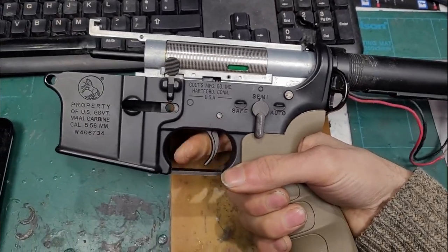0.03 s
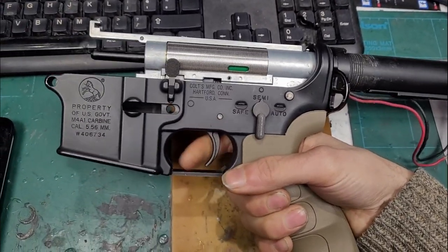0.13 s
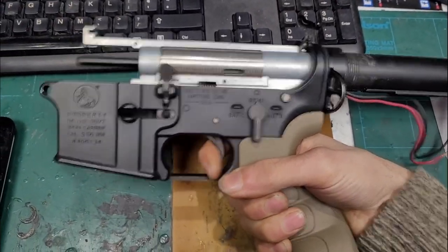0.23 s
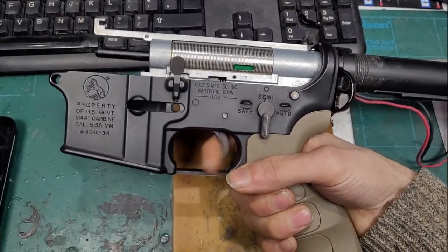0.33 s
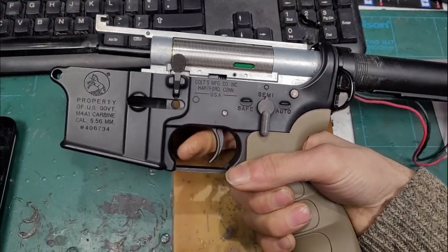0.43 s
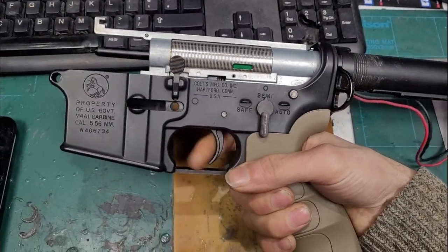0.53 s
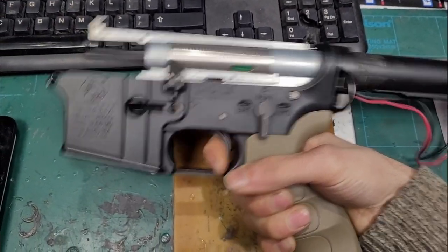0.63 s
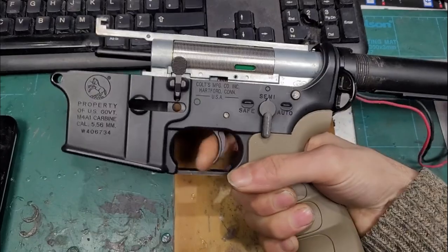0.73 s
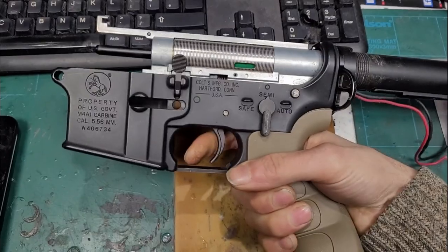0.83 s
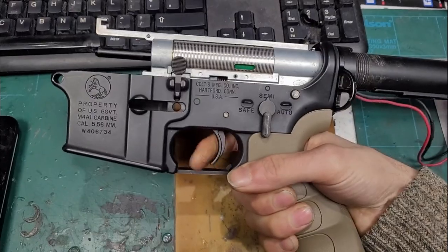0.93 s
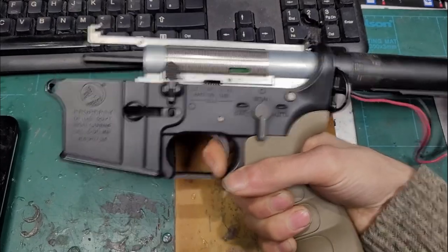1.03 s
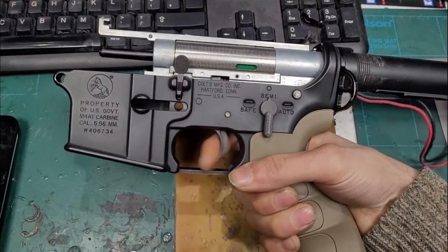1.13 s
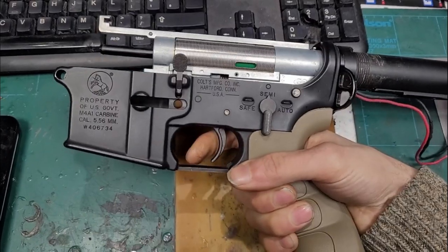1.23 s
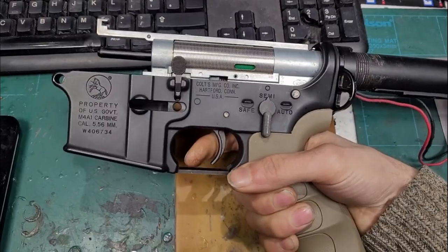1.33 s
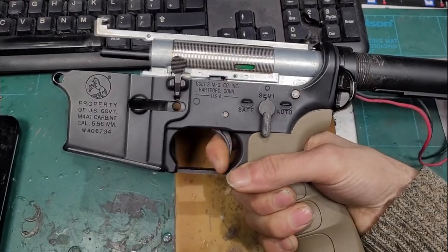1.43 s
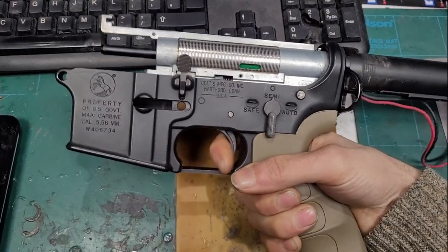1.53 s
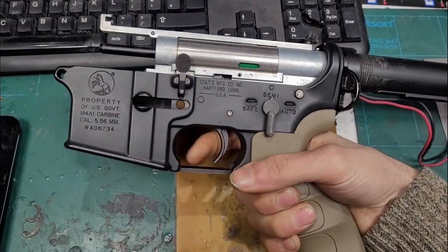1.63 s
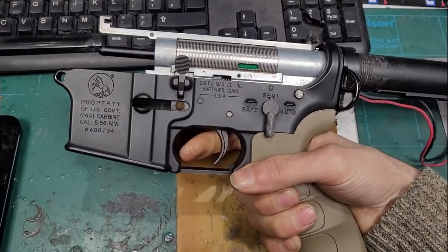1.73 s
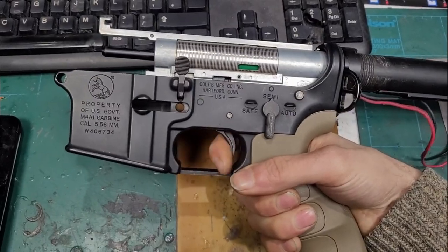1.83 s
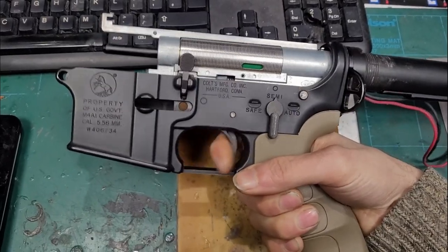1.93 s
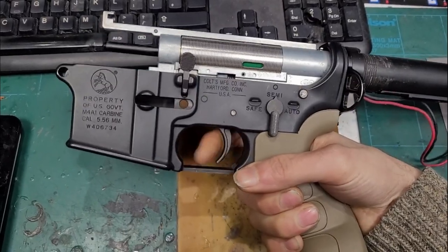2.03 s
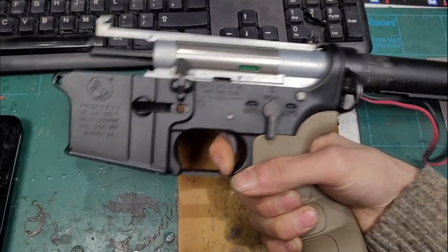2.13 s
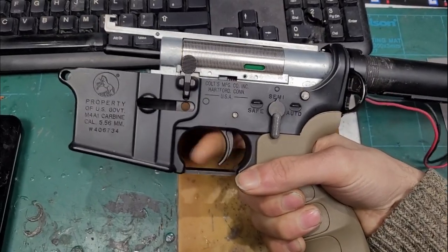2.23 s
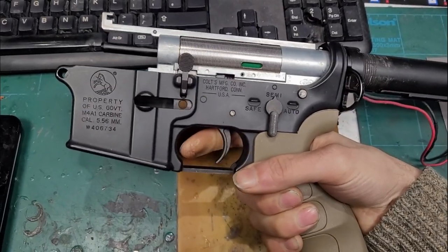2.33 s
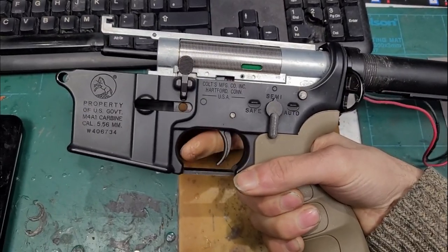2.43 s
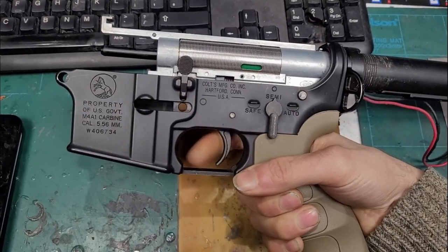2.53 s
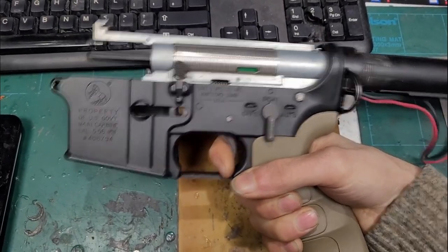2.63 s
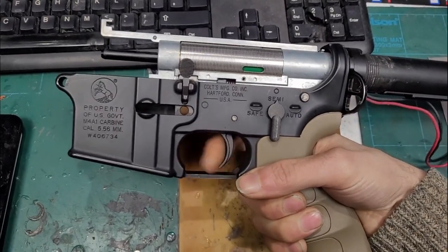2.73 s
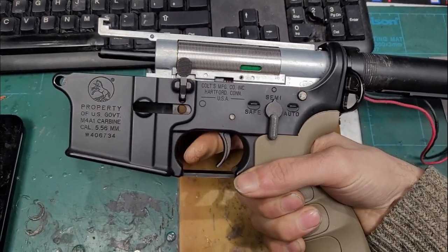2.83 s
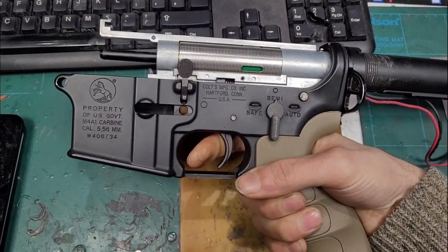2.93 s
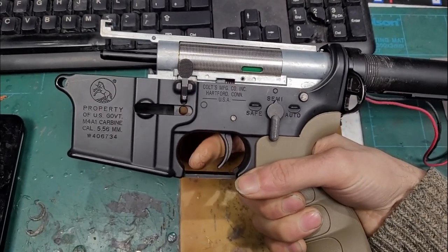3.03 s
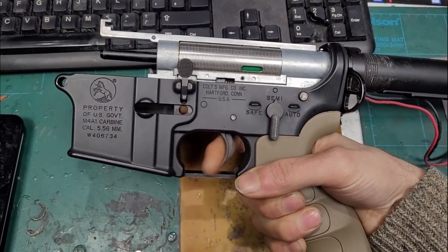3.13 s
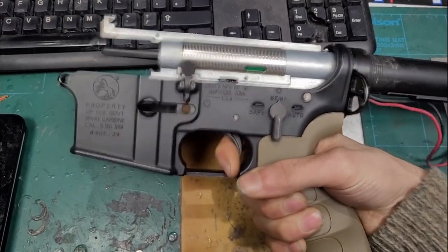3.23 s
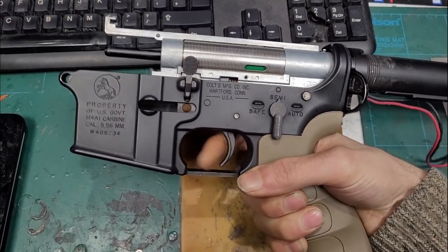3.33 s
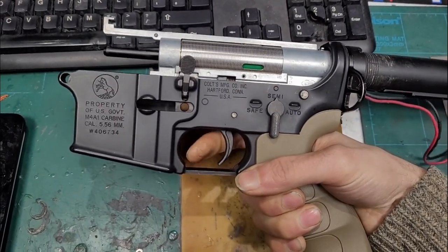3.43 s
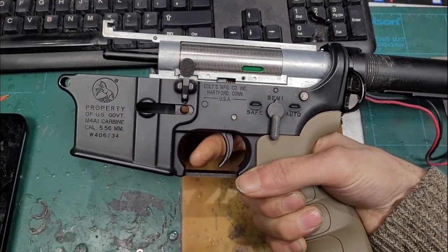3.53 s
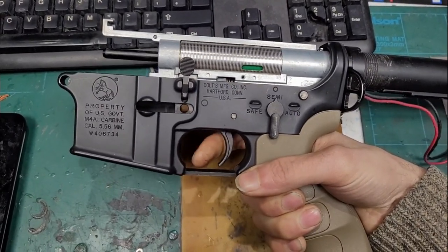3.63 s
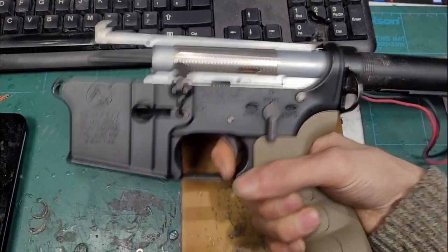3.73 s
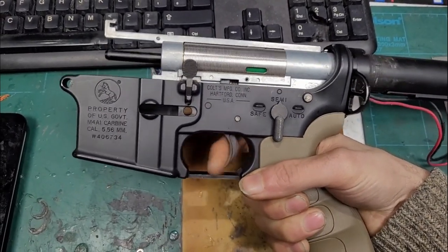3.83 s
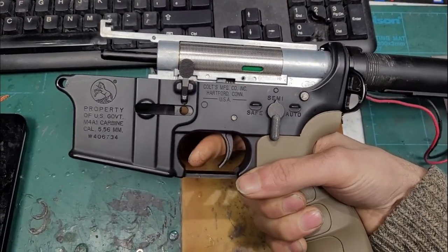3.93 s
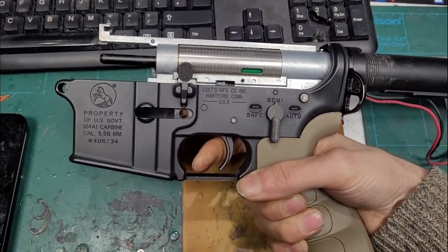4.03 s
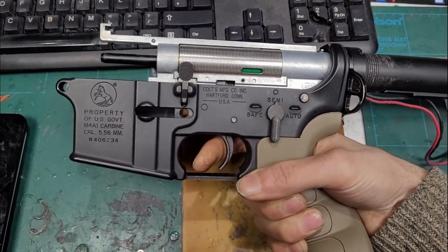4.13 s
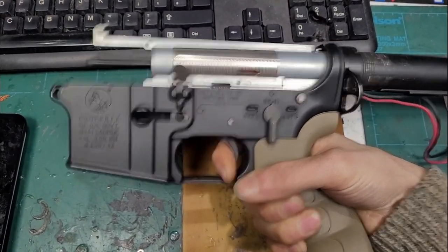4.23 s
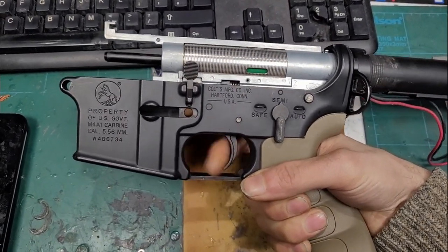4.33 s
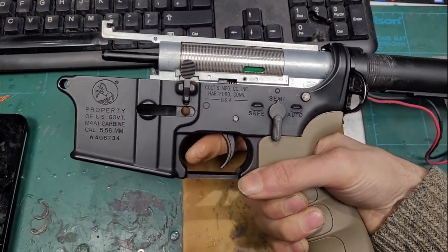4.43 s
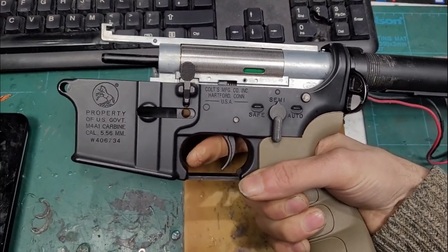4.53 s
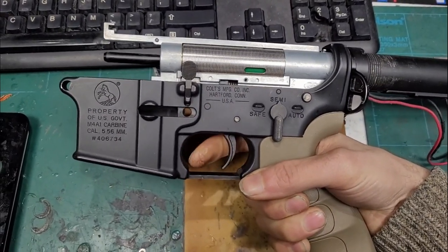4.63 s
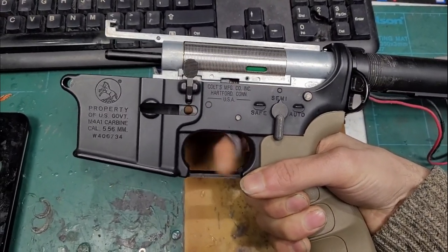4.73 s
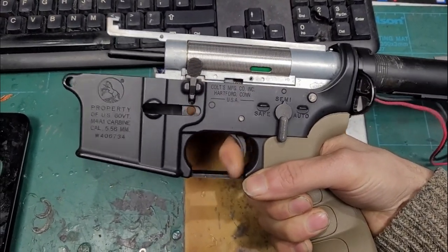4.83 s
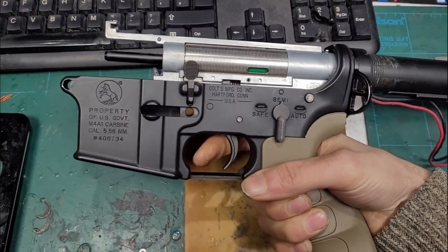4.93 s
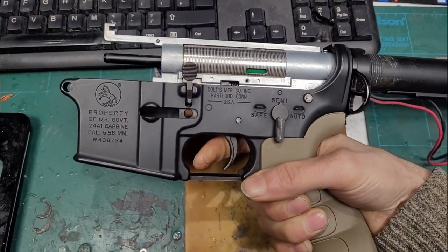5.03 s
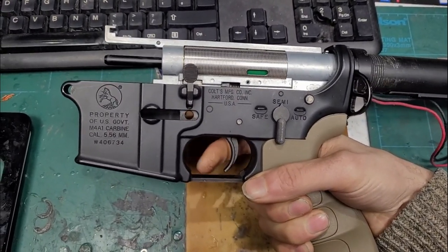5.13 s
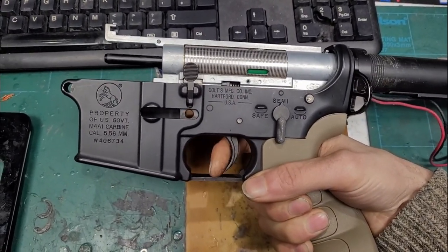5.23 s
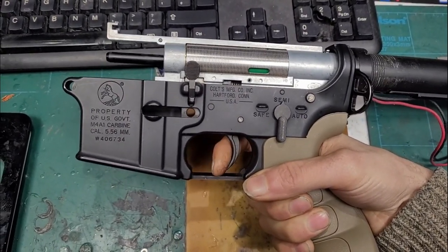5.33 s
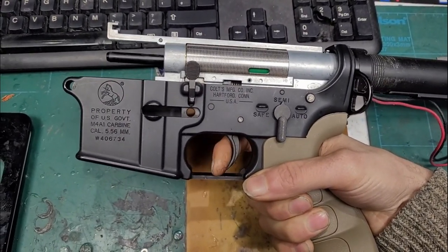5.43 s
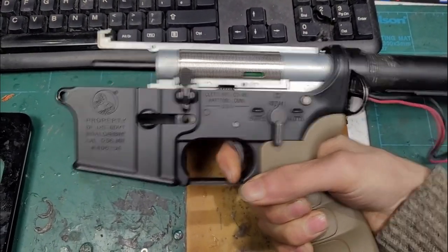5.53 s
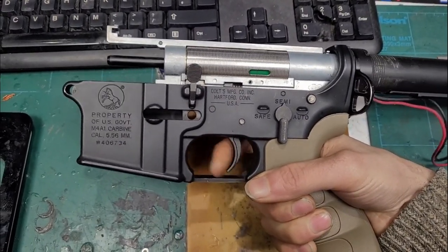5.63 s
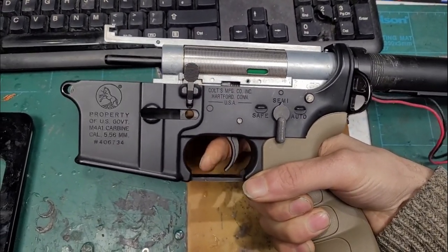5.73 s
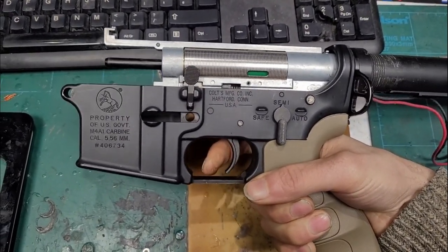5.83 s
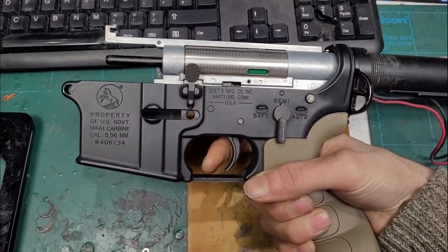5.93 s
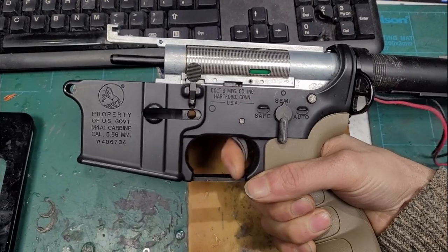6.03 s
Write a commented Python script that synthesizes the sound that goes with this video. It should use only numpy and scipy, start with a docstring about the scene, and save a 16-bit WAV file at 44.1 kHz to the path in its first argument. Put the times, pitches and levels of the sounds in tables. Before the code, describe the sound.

A phone close to a bench picks up about a dozen dry, bright mechanical shots from an airsoft rifle's open gearbox. Gears grind for a fraction of a second, the piston snaps forward with a hard clack, metal rattles and everything halts. Spacing is uneven, from a quick pair to longer gaps. Tiny latch ticks and one dull finger tap fall between; soft fans hum in the small room.

```python
"""A workbench in a small quiet room, where fans hum: an open electric airsoft gearbox runs under a phone.
In each cycle the motor spins up and gear teeth grind (noise gated by uneven tooth contacts).
The piston is picked up, released and slams home (short noise cracks), then the gears coast and stop.
The metal shell and the bench ring as sets of fading tones; small ticks and one dull tap come in between.
The fans are shaped noise with wandering tones, and the walls add a short tail of echoes."""
import sys
import numpy as np
from scipy import signal
from scipy.fft import rfft, irfft
from scipy.io import wavfile
from scipy.ndimage import uniform_filter1d

SR = 44100
rng = np.random.default_rng(int(sys.argv[2]) if len(sys.argv) > 2 else 0)


def wav_record(signal):
    """Record a signal, one row per channel, as 16-bit PCM in the file named by sys.argv[1]."""
    frames = np.transpose(np.atleast_2d(signal))
    bounded = np.clip(frames, -1, 1)
    # unit amplitude maps onto the largest positive 16-bit level
    quanta = np.round(bounded * 32767).astype(np.int16)
    wavfile.write(sys.argv[1], SR, quanta)


N = 268392
t = np.arange(N) / SR

# gearbox cycles: (gear meets piston [s], motor start before that [s], gears about halted after that [s],
# whole cycle [dB], then changes to pick-up [dB], release [dB], slam [dB], bounce [dB], tappet snap [dB])
CYCLES = [(-.135, 0.02, .12, -4, 0, 0, 0, 0, 0), (0.2903, .028, 0.11, -3, -3.5, -4, .5, -2.2, 1.5),
          (0.6663, .029, 0.11, -3, -0.2, -3, 2.5, -0.1, 0.5),
          (1.0832, 0.03, 0.092, -2.5, -2, -3, 1.5, 0.6, -0.5), (1.5126, .028, .12, -4, 0, 3, 1.5, -1.3, 1),
          (1.92, .029, 0.1, -3, 0.5, -4, 3.5, 0.3, -3.5), (2.178, .03, .14, -5, 9, 5.5, 8, -4, 3),
          (2.6765, 0.027, .11, -3.5, -1.15, 5, -1.8, 0.4, 1.5),
          (3.2572, .03, .13, -3.5, 1, -9, 5.5, 3, -1.5), (3.7963, .029, .125, -3, 1, 2, -0.5, -2.3, 4),
          (4.295, 0.026, 0.13, -2.5, 3.5, -6, -3, 3.7, .5),
          (4.839, 0.029, 0.12, -3.5, 4.5, -1.5, 6.5, -1.7, -8),
          (5.5828, .031, 0.11, -2.5, 2, -12, 5, -1.5, 1.9), (6.113, 0.0281, 0.097, -14.5, 0, 0, 0, 0, 0)]
# blows of one cycle: pick-up by the sector gear, release by the last tooth, slam into the cylinder head,
# bounce, second bounce, tappet plate snap and two rattles in order, then the motor's earlier jerk
# as it takes up the slack:
# (time after pick-up [s], crack [dB], shell [dB], bench [dB], push direction [sign], crack decay [s])
BLOWS = [(0, -8, -5, -41, 1, 0.0023), (.0168, -13.5, -7.5, -33.5, -1, 0.0047),
         (.0266, -16, -1.5, -25.5, 1, 0.0026), (0.036, -27.5, 0.5, -22.5, -1, .0028),
         (.0418, -21.5, -13, -27, 1, 0.0019), (.0508, -12.5, -8.5, -32.5, -1, .0045),
         (.069, -27.5, -9, -43, 1, .0028), (0.0774, -31, -26, -43.5, -1, .0025),
         (-.0185, -28.5, -8.5, -48.5, 1, 0.0046)]
# ringing tones of the metal shell:
# (pitch [Hz], width [Hz], level [dB], left minus right [dB], left leads by [radians])
SHELL = [(885.6, 300, -8.5, -2.5, -0.5), (1150, 210, -5, -1.5, 3.5), (1163, 110, 0, -2.5, -0.73),
         (1426, 630, -16, 3.5, 1), (1661, 71, -12.5, -1.5, -8), (1833, 88, -7.5, -2, 7),
         (1992.6, 56, -9.5, 3.5, 3), (2147, 160, -5, -2, 6.5), (2350, 100, -1, -6.5, 1.5),
         (3390, 130, -3.5, 5.5, 1), (3624, 70, -7, 2.5, 2), (5600, 42, -11, 6.5, 5.5),
         (15540, 120, -10, 2.5, 0.5)]
# ringing tones of the bench:
# (pitch [Hz], width [Hz], level [dB], left minus right [dB], left leads by [radians])
BENCH = [(55, 36, -8, 5.5, 0.97), (128, 40, -2.5, 8.5, 2.2), (150, 40, -6, -1, 0.81),
         (234, 26, 3.5, 0.5, 0.78), (340, 94, 7, -5.5, 0.3), (418, 50, -3, -7, 0.75),
         (453.7, 19, -4, -3, 1.6), (734.2, 230, -16, 1, 0.72)]
ROOM_T60_S = 0.23  # time for the room echo to fade by 60 dB


def undb(db):
    """Turns decibels into gain."""
    return 10 ** (np.asarray(db, float) / 20)


def sides(pan_db):
    """Left and right gain for a level difference, left minus right, in dB."""
    return undb(np.array([[pan_db], [-pan_db]]) / 2)


def high_pass(x, hz):
    """Takes away the sound below hz."""
    return signal.sosfilt(signal.butter(2, hz, "high", fs=SR, output="sos"), x)


def low_pass(x, hz):
    """Takes away the sound above hz."""
    return signal.sosfilt(signal.butter(2, hz, fs=SR, output="sos"), x)


def colour(x, hz, db):
    """Shapes the spectrum of x by a curve of dB over log frequency."""
    f = np.maximum(np.arange(N // 2 + 1) * SR / N, 1)
    gain = undb(np.interp(np.log(f), np.log(hz), db))
    return irfft(rfft(x) * gain, N)


def ring(x, hz, width_hz):
    """One ringing tone as a rotating arrow: a unit blow starts it at size 1, a wider tone fades faster."""
    turn_and_fade = np.exp((2j * np.pi * hz - np.pi * width_hz) / SR)
    return signal.lfilter([1], [1, -turn_and_fade], x)


def body(x, modes):
    """An object struck or shaken by x: the sum of its ringing tones, left and right."""
    out = np.zeros((2, N))
    for hz, width_hz, db, pan_db, lead in modes:
        phase = np.exp(0.5j * lead * np.array([[1], [-1]]))
        out += undb(db) * sides(pan_db) * (ring(x, hz, width_hz) * phase).imag
    return out


def pair_noise(alike_hz):
    """Left and right noise that share their bass and differ in the treble."""
    shared = low_pass(rng.standard_normal(N), alike_hz)
    separate = high_pass(rng.standard_normal((2, N)), alike_hz)
    return shared + separate


def walk(per_s):
    """Slow random drift with spread 1: noise averaged twice over 1 / per_s seconds."""
    span = int(SR / per_s)
    slow = uniform_filter1d(uniform_filter1d(rng.standard_normal(N), span), span)
    return slow / np.std(slow)


def spike(s, size):
    """A one-sample impulse at time s."""
    return size * (np.arange(N) == int(round(s * SR)))


def air():
    """Fans: the moving air is shaped noise, and each fan tone is a sine whose pitch and level wander."""
    # colour of the fan noise: (frequency [Hz], relative level [dB per Hz])
    air_colour = [(25, -31), (55, -4.5), (90, -22), (200, -16), (320, -2), (420, -9), (560, -10),
                  (700, -21.5), (1100, -22), (1700, -23), (2600, -24.5), (3300, -27.5), (7000, -29),
                  (9000, -37.5), (16000, -40.5)]
    # level of the deep rumble over time: (time [s], level [dB])
    rumble_level = [(0, 1.5), (1.3, 10.5), (2.3, 2), (3.3, -1.5), (6.1, 1)]
    # fan tones: (pitch [Hz], level [dB], pitch wander [Hz], left minus right [dB])
    fan_tones = [(59, -88, 3, -4), (118.4, -80, 2, 0), (355, -75.5, 4, -8), (447, -76, 3, -2),
                 (592, -86, 8, 0), (1093, -92, 6, -6), (1389, -82.5, 2, 2), (1790, -96, 15, -2),
                 (2150, -95, 15, 0), (2536, -95, 18, -8), (2780, -93, 14, -5)]
    noise = colour(pair_noise(1100), *np.transpose(air_colour))
    noise /= np.std(noise)
    rumble = low_pass(noise, 110)
    extra_rumble = undb(np.interp(t, *np.transpose(rumble_level))) - 1
    swell = undb(-70 + 0.5 * walk(3.6))  # mean level and swell, both in dB
    out = swell * (noise + extra_rumble * rumble)
    for hz, tone_db, wander_hz, pan_db in fan_tones:
        drift = uniform_filter1d(rng.standard_normal(N), SR // 20) * np.sqrt(SR / 20)
        waver_db = 1.3 * min(hz / 1400, 1) * walk(11)  # low tones waver less
        phase = 2 * np.pi * np.cumsum(hz + wander_hz * drift) / SR
        out += np.sqrt(2) * undb(tone_db + waver_db) * sides(pan_db) * np.sin(phase)
    return out


def gear_train():
    """Tooth contacts, faster at higher speed, gate the grind; gives grind, shell drive and share driven."""
    SPIN_UP_DB_PER_S, RUN_UP_S, COAST_S = 2501, 0.013, 0.14  # rise of level; time constants of speed
    HALT_DB, HALT_S = 22, 0.069  # braking loss reaches HALT_DB after HALT_S
    TAKE_UP_S, LET_GO_S = 0.01, 0.0052  # spring load builds after the pick-up, drops at the release
    UNDRIVEN_S = 0.018  # the share driven falls off over this time after the release
    LULL_DB, LULL_S = 8.5, 0.0028  # the teeth lose contact just before the slam and the tappet snap
    TEETH_PER_S, EXTRA_TEETH_PER_S = 1200, 100  # the first follows the speed, the second is steady
    TOOTH_SCATTER_DB, TOOTH_S = 2, 0.00031  # spread of tooth strength, decay of a contact
    TOOTH_JITTER = 0.35  # spread of tooth timing, as a share of the gap between teeth
    SLIDE = 0.96  # sliding between the contacts
    WOBBLE_DB, WOBBLE_S = 1, 0.0013  # worn gears run unevenly
    release_s, slam_s, tappet_s = BLOWS[1][0], BLOWS[2][0], BLOWS[5][0]

    grind, drive, rate, driven = np.zeros((4, N))
    for start, lead, halt, db, *_ in CYCLES:
        u = t - start
        speed = 1 - np.exp(-np.maximum(u + lead + 0.0033, 1e-4) / RUN_UP_S)
        coast = np.maximum(u - tappet_s, 0)
        taken_up = np.clip(u / TAKE_UP_S, 0, 1)
        not_let_go = np.clip(1 + (release_s + LET_GO_S - u) / LET_GO_S, 0, 1)
        spring = taken_up * not_let_go
        lull_db = sum(LULL_DB * np.exp(-((u - s + LULL_S / 2) / LULL_S) ** 2)
                      for s in (slam_s, tappet_s))
        rise_db = -SPIN_UP_DB_PER_S * np.maximum(0.003 - lead - u, 0)
        on = undb(db - lull_db + rise_db) * (u > -lead - 0.004)
        # the braked motor fades faster and faster
        brake_db = HALT_DB * (np.maximum(u - halt + 0.033, 0) / HALT_S) ** 2.7
        # base dB, dB per tenfold speed, dB at full spring load, dB lost per second of coasting
        grind_db = -21 + 23.5 * np.log10(speed) + 4.5 * spring - 190.5 * coast
        shake_db = -26 + 3.5 * np.log10(speed) - 1.5 * spring - 270 * coast
        grind += on * undb(grind_db - brake_db)
        drive += on * undb(shake_db - 0.9 * brake_db)
        # from its motor start on, each cycle takes over tooth rate and share driven
        tooth_rate = TEETH_PER_S * speed * np.exp(-coast / COAST_S) + EXTRA_TEETH_PER_S
        rate = np.where(u > -lead, tooth_rate, rate)
        still_driven = np.exp(-(np.maximum(u - release_s, 0) / UNDRIVEN_S) ** 2)
        driven = np.where(u > -lead, still_driven, driven)

    chance = rng.standard_normal((N, 2))
    hits = np.flatnonzero(np.diff(np.floor(np.cumsum(rate / SR))) > 0)
    late = TOOTH_JITTER * chance[hits, 0] * SR / rate[hits]
    contacts = np.zeros(N)
    places = np.clip(hits + late, 0, N - 1).astype(int)
    contacts[places] = undb(TOOTH_SCATTER_DB * chance[hits, 1])
    gate = SLIDE + signal.lfilter([1], [1, -np.exp(-1 / (TOOTH_S * SR))], contacts)
    span = int(WOBBLE_S * SR)
    wobble = np.sqrt(span) * uniform_filter1d(rng.standard_normal(N), span)
    gate *= undb(WOBBLE_DB * wobble)
    return grind * gate, drive * gate, driven


def backlash(grind):
    """Loose teeth knock at random: short fading sines, each with its own pitch and side, following grind."""
    KNOCKS_PER_S, DECAY_S = 700, 0.0014
    LOW_HZ, HIGH_HZ = 1465, 7870
    out = np.zeros((2, N + 900))
    u = np.arange(900) / SR
    smooth = uniform_filter1d(grind, SR // 200)
    for when, pitch, size, side in rng.random((int(KNOCKS_PER_S * N / SR), 4)):
        i = int(when * N)
        if smooth[i] > 1e-4:
            hz = LOW_HZ * (HIGH_HZ / LOW_HZ) ** pitch
            db = -3.5 - 3 * np.log(size + 0.022)  # a few knocks are much louder
            phase = 2 * np.pi * hz * u + np.array([[0], [3 * side]])
            knock = np.exp(-u / DECAY_S) * np.sin(phase)
            out[:, i:i + 900] += smooth[i] * undb(db) * sides(8 * side - 3) * knock
    return out[:, :N]


def blows():
    """Each blow gives a fading crack, a sharp first contact, and pushes on shell and bench."""
    # rows of BLOWS whose strength each cycle sets: [row number]
    main_rows = [0, 1, 2, 3, 5]
    SNAP = 2.5  # first contact of a blow over the crack noise that follows
    CHATTER_DB, CHATTER_S = -17.5, 0.004  # each blow keeps the shell chattering for a moment
    SKID_DB, SKID_S = -22, 0.005  # the gun skids a little on the bench after each blow
    pad = SR // 4  # room for blows that reach past either end
    crack, snap, shell = np.zeros((3, N + 2 * pad))
    bench = np.zeros((2, N + 2 * pad))
    u = np.arange(SR // 25) / SR
    chance = rng.standard_normal((len(CYCLES), len(BLOWS), 5))
    grit = rng.standard_normal((3, N + 2 * pad))
    for (start, _, _, db, *main_db), luck in zip(CYCLES, chance):
        strength_db = db + 2 * luck[:, 0]
        strength_db[main_rows] = db + np.array(main_db)
        for blow, hard_db, (_, timing, shell_luck, *side_luck) in zip(BLOWS, strength_db, luck):
            s, crack_db, shell_db, bench_db, way, decay = blow
            i = pad + int((start + s * (1 + 0.005 * timing)) * SR)
            after = slice(i, i + len(u))
            crack[after] += undb(crack_db + hard_db) * np.exp(-u / decay)
            snap[i] += SNAP * undb(crack_db + hard_db)
            chatter = undb(CHATTER_DB) * np.exp(-u / CHATTER_S) * grit[0, after]
            shell[after] += undb(shell_db + hard_db + 1.5 * shell_luck) * ((u == 0) + chatter)
            # thump strength varies at random, separately left and right
            skid = undb(SKID_DB) * np.exp(-u / SKID_S) * grit[1:, after]
            thump_db = bench_db + hard_db + 3.5 * np.array(side_luck)[:, None]
            bench[:, after] += undb(thump_db) * (np.sign(way) * (u == 0) + skid)
    inside = slice(pad, -pad)
    return crack[inside], snap[inside], shell[inside], bench[:, inside]


def gearbox():
    """Grind and cracks sound as metallic noise and make shell and gears ring; blows thump the bench."""
    # broad colour of grind and cracks at each microphone port: (frequency [Hz], left [dB], right [dB])
    metal_colour = [(120, -45.5, -40.5), (394, -24.5, -30), (706, -21.5, -19), (1080, -10.5, -16.5),
                    (1350, -8, -19), (2090, -6.5, -4), (4440, -7.5, -8), (6100, -8, -2.5), (8350, -3, -7.5),
                    (9800, -4, -11), (12500, -3, -4.5), (14500, -8, -5.5), (15740, -4, -7)]
    # gear rings under drive, from motor start until shortly after the release:
    # (pitch [Hz], width [Hz], level [dB], left minus right [dB], left leads by [radians])
    driven_gears = [(5004, 250, -2, 7, 2.4), (7640, 470, 5, 4.5, 1.5), (650, 450, -11, -7, 0.09)]
    # gear rings running free, after the release:
    # (pitch [Hz], width [Hz], level [dB], left minus right [dB], left leads by [radians])
    free_gears = [(5330, 1200, 6, -9.5, 1.8), (6920, 270, 0, -5, 0.7), (10200, 1300, 6.5, 15, 1.2)]
    grind, drive, driven = gear_train()
    crack, snap, shell, bench = blows()

    hz, *port_db = np.transpose(metal_colour)
    rough = (grind + crack) * pair_noise(1200) + snap
    metal = np.array([colour(x, hz, db) for x, db in zip(rough, port_db)])

    mesh = grind * rng.standard_normal(N)
    under_drive = undb(-21.5) * body(mesh * driven, driven_gears)
    free = undb(-19.5) * body(mesh * (1 - driven) ** 2, free_gears)
    gears = high_pass(under_drive + free, 600)

    shaking = (undb(-13.5) * drive + undb(-20.5) * crack) * pair_noise(2700)
    force = high_pass(undb(-6) * shell + shaking, 650)  # the small shell radiates no bass
    shell_sound = undb(-8) * body(force, SHELL)
    bench_push = bench + undb(-46) * drive * pair_noise(25)
    bench_sound = undb(-8.5) * body(bench_push, BENCH)
    return undb(7.5) * metal + gears + backlash(grind) + shell_sound + bench_sound


def ticks():
    """Trigger and latch ticks are short ringing noise bursts; a finger tap pushes bench and shell."""
    # trigger and latch ticks: (time [s], level [dB], pitch [Hz], left minus right [dB])
    tick_list = [(.0135, -33, 4960, 0), (.0424, -45, 8000, 3), (.4265, -29, 3260, 5), (.8082, -38, 2220, 5),
                 (1.2324, -46, 2220, 2), (4.433, -40, 7190, 4), (.4931, -52, 9000, 2.5),
                 (.5216, -54, 10800, 3)]
    TAP_S, TAP_DB = 5.452, -61.5  # a finger taps the grip
    out = body(spike(TAP_S, -undb(TAP_DB)), BENCH)
    out += body(spike(TAP_S, undb(TAP_DB - 7)), SHELL)
    for s, db, hz, pan_db in tick_list:
        fade = np.exp(-np.maximum(t - s, 0) / 0.003) * (t >= s)
        burst = high_pass(fade * rng.standard_normal((2, N)), 1800)
        out += undb(db) * sides(pan_db) * (0.5 * burst + 0.19 * ring(burst, hz, 1800).imag)
    return out


def room(x):
    """Wall echoes: a short, dull tail of fading noise, different at each port."""
    u = np.arange(SR // 2) / SR
    fade = np.exp(-np.log(1000) * u / ROOM_T60_S) * (u > 0.004)
    tail = rng.standard_normal((2, len(u))) * fade
    tail = signal.sosfilt(signal.butter(1, 2590, fs=SR, output="sos"), tail)
    tail /= np.sqrt(np.sum(tail ** 2, axis=1, keepdims=True))
    return undb(-23) * signal.fftconvolve(x, tail, axes=1)[:, :N]


def earlier_echo():
    """The room still rings from the cycle before: fading noise in the middle range."""
    band = signal.butter(1, [900, 4500], "band", fs=SR, output="sos")
    noise = signal.sosfilt(band, rng.standard_normal((2, N)))
    return undb(-41.5 - 60 * t / ROOM_T60_S) * noise


def scene():
    """The gun is nearer the left port, so its sound reaches the right one later; room and fans join in."""
    RIGHT_LAG = 3.6  # samples
    near = gearbox() + ticks()
    near[1] = np.interp(np.arange(N) - RIGHT_LAG, np.arange(N), near[1])
    return near + room(near) + earlier_echo() + air()


def record(dry):
    """The phone drops the deepest bass, rounds the loudest peaks and cuts the top."""
    thin = high_pass(dry, 40)
    rounded = np.tanh(0.56 * thin) / 0.64
    top_cut = signal.ellip(12, 0.2, 80, 15900, fs=SR, output="sos")
    return signal.sosfilt(top_cut, rounded)


dry = scene()
out = record(dry)
wav_record(out)
```